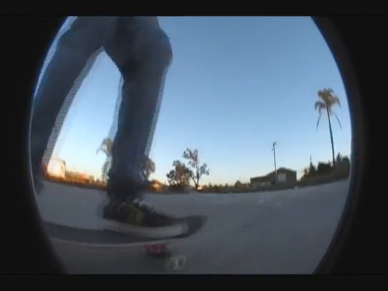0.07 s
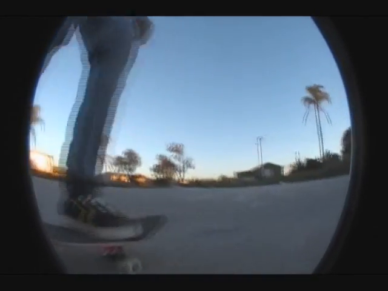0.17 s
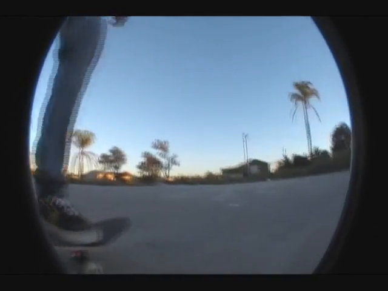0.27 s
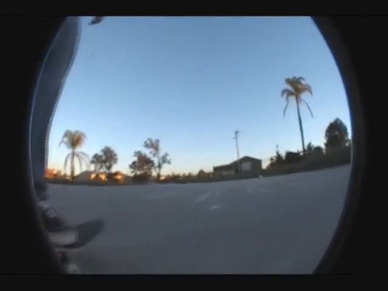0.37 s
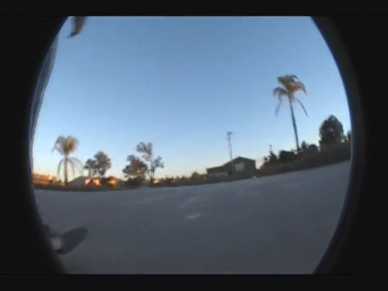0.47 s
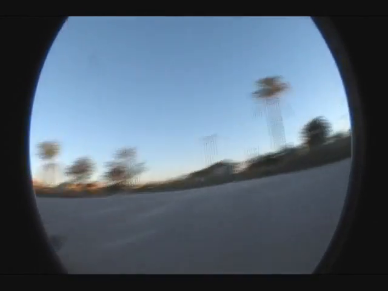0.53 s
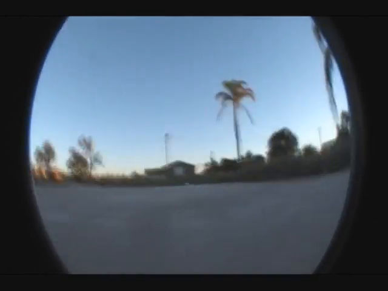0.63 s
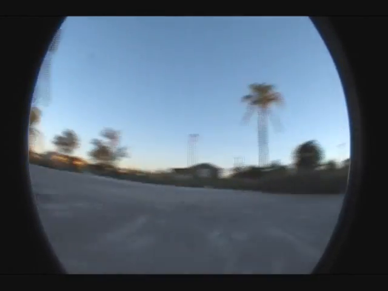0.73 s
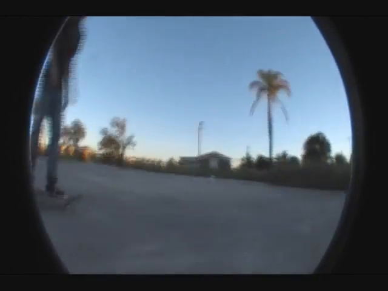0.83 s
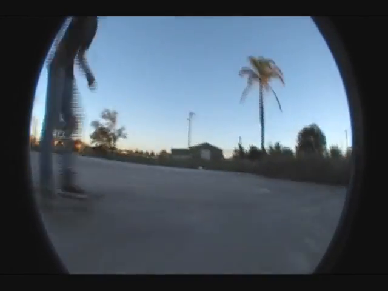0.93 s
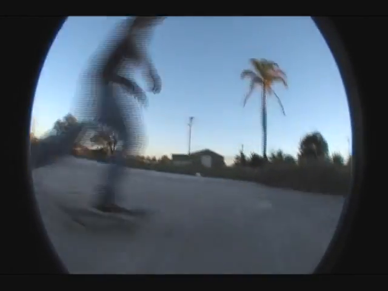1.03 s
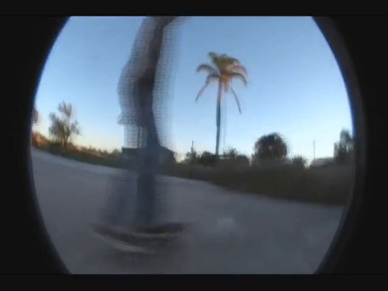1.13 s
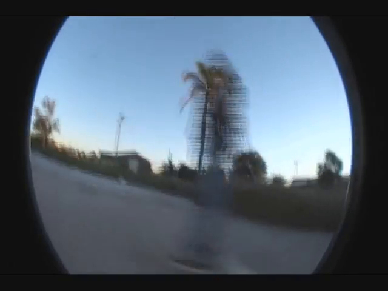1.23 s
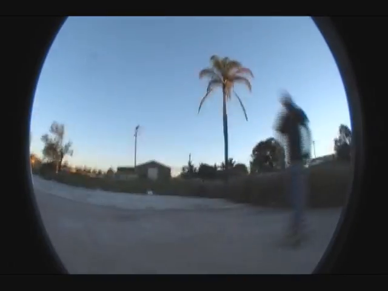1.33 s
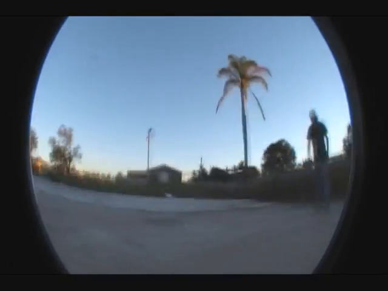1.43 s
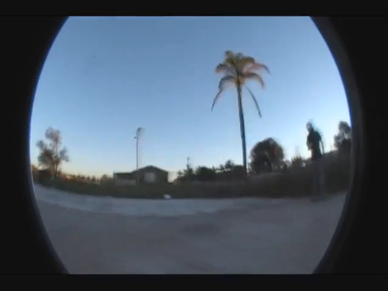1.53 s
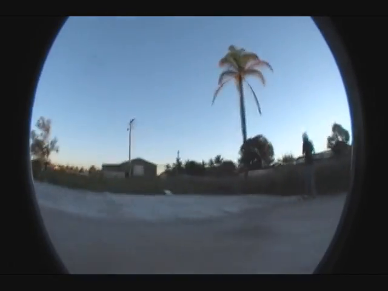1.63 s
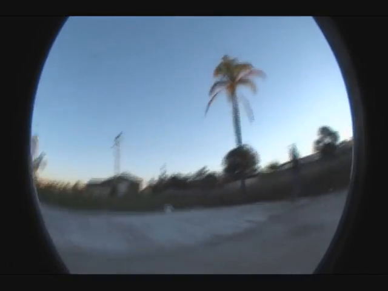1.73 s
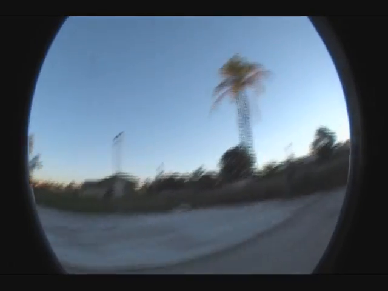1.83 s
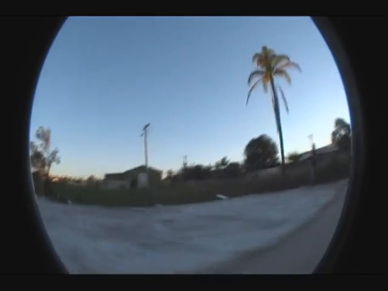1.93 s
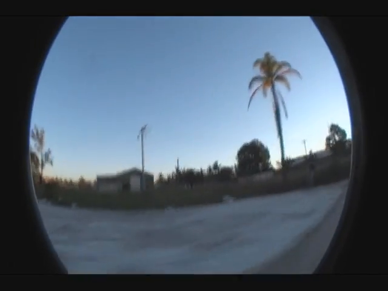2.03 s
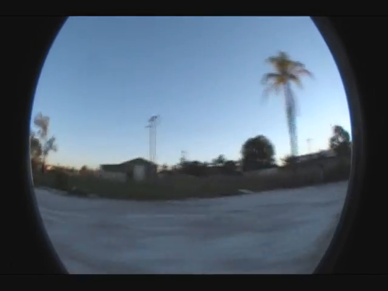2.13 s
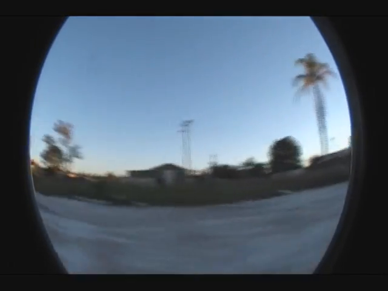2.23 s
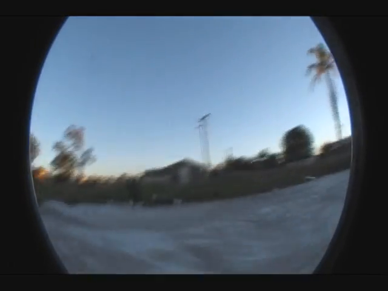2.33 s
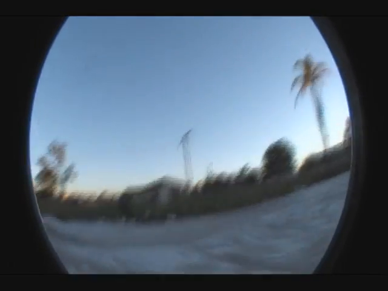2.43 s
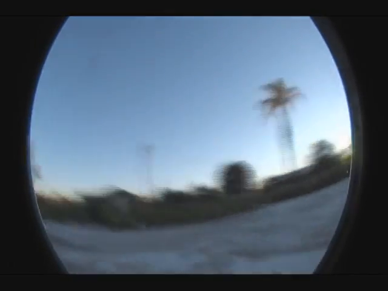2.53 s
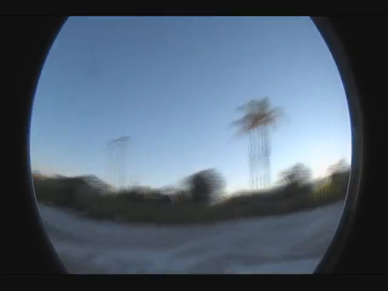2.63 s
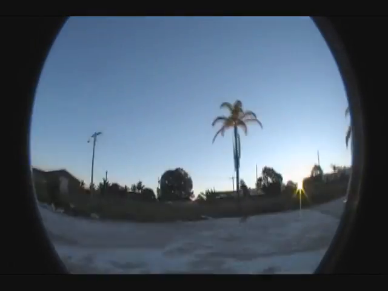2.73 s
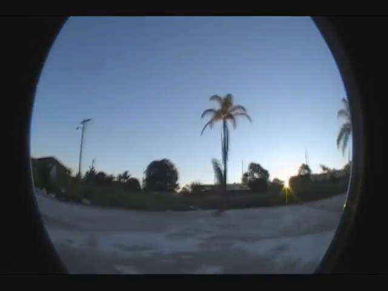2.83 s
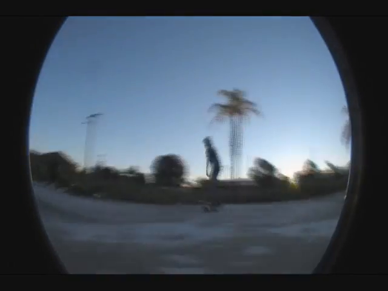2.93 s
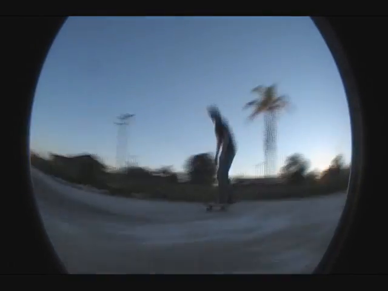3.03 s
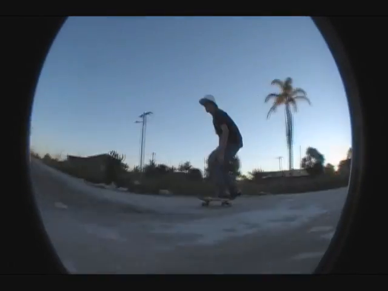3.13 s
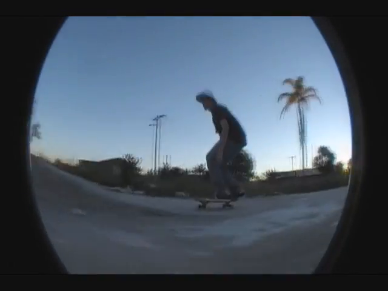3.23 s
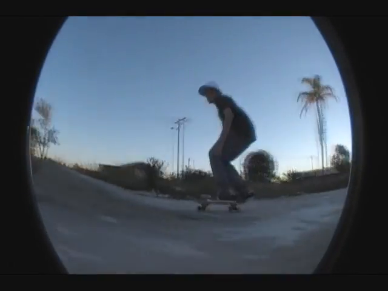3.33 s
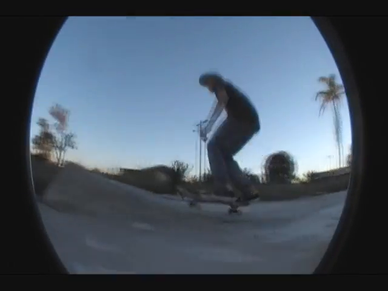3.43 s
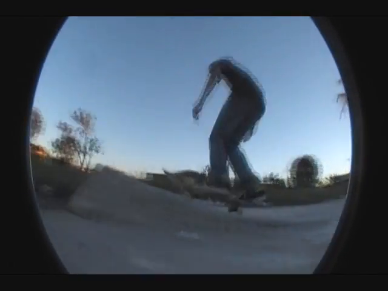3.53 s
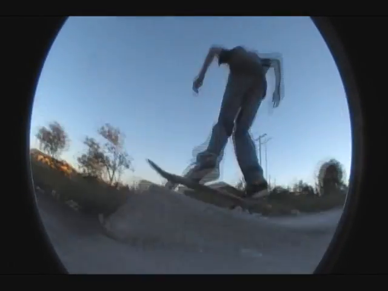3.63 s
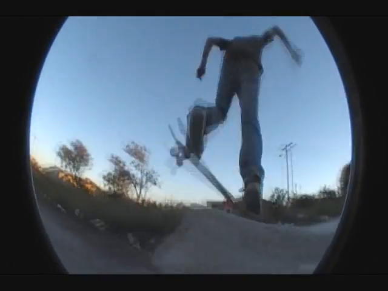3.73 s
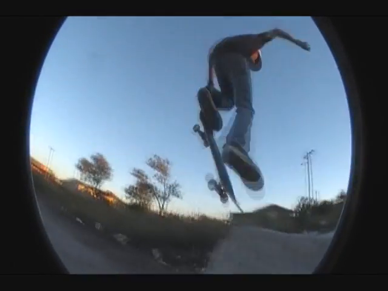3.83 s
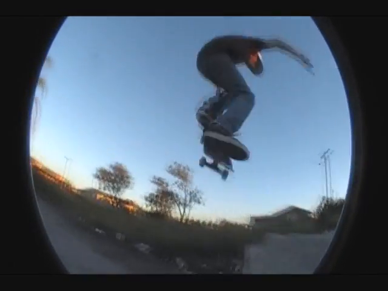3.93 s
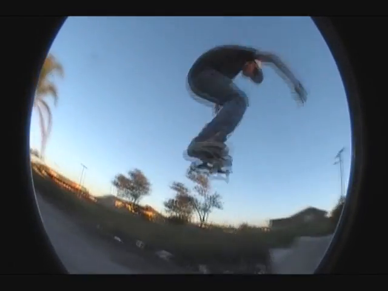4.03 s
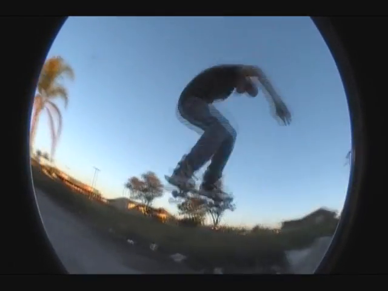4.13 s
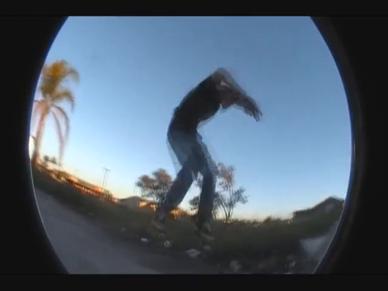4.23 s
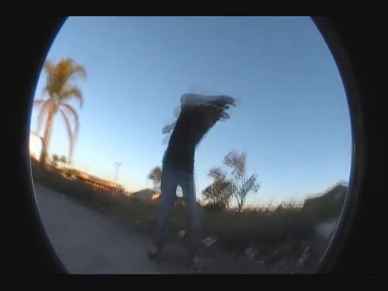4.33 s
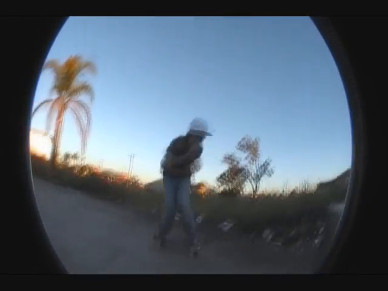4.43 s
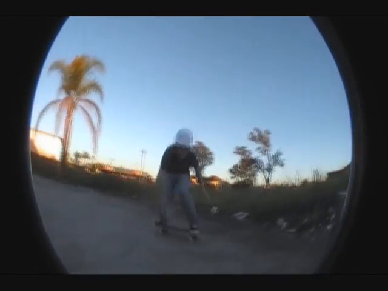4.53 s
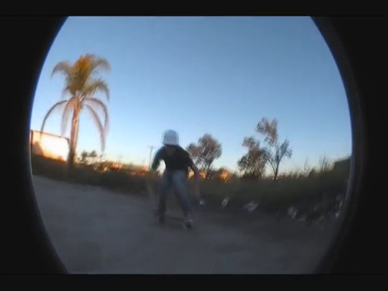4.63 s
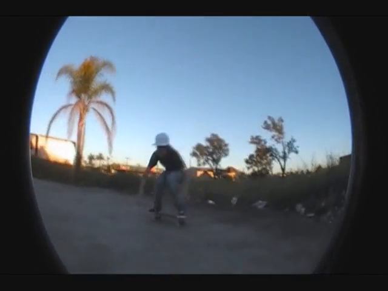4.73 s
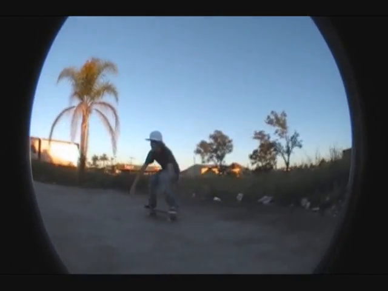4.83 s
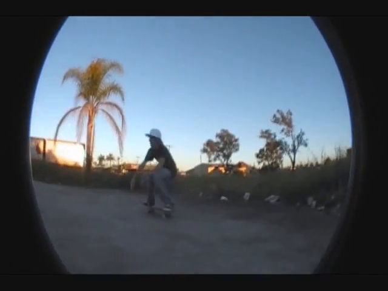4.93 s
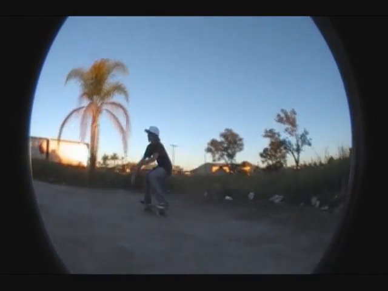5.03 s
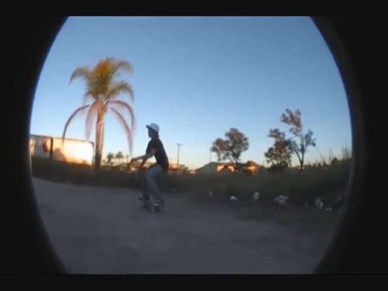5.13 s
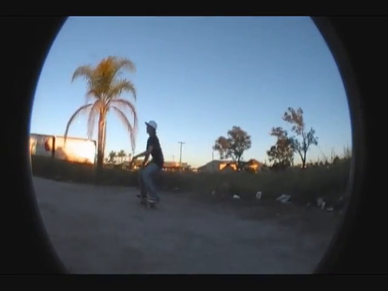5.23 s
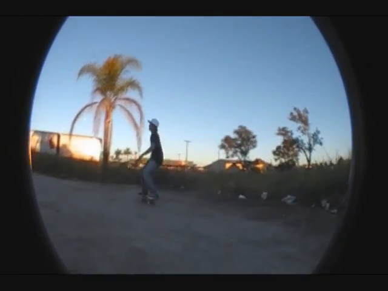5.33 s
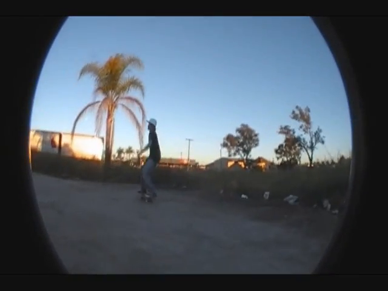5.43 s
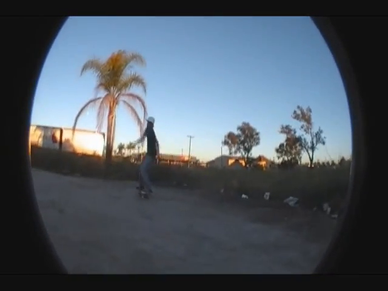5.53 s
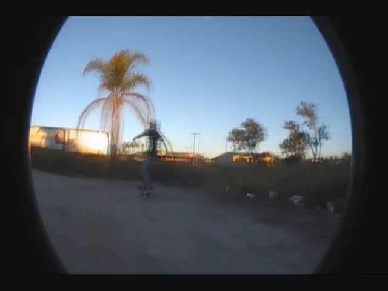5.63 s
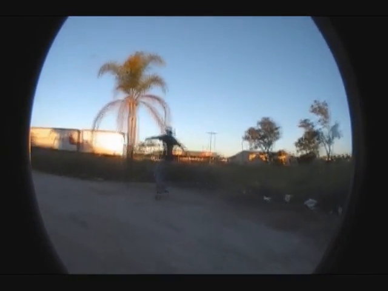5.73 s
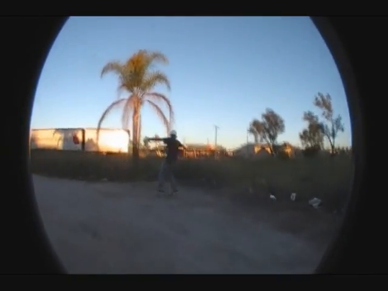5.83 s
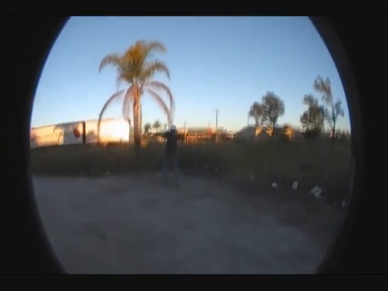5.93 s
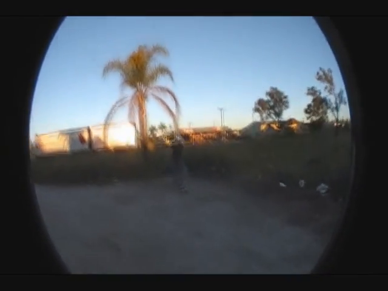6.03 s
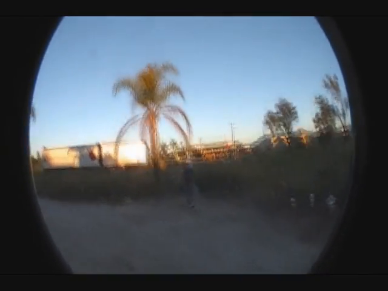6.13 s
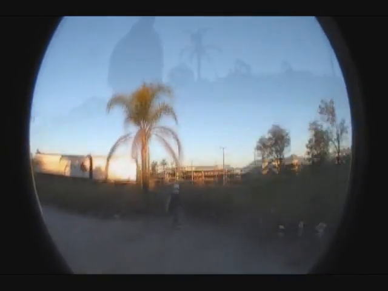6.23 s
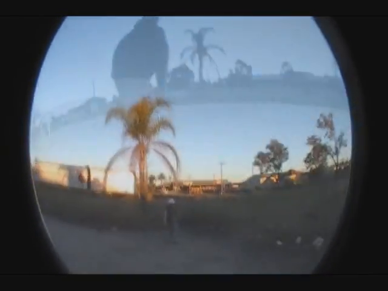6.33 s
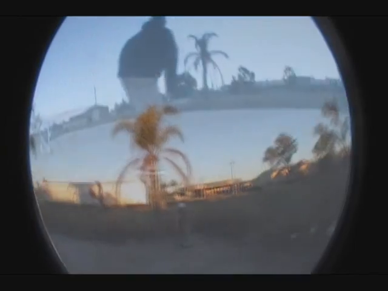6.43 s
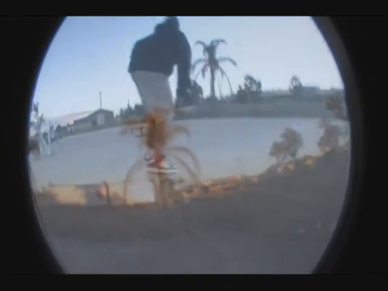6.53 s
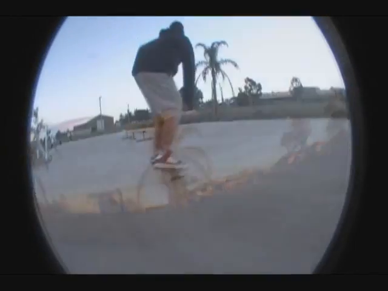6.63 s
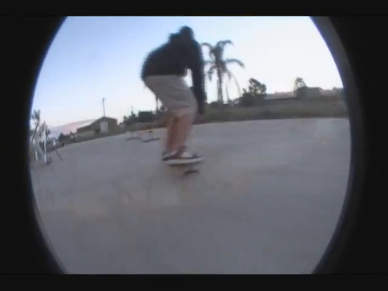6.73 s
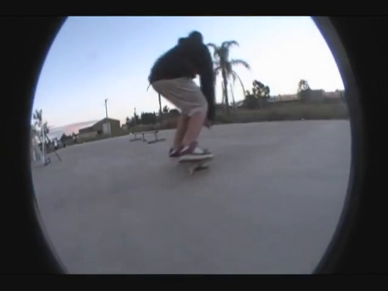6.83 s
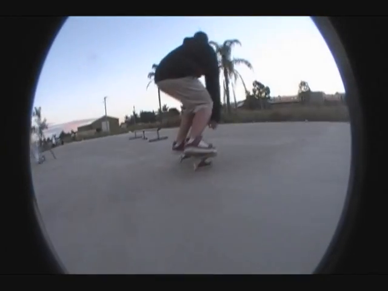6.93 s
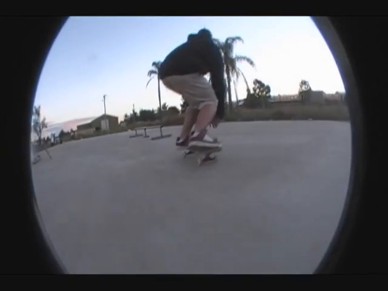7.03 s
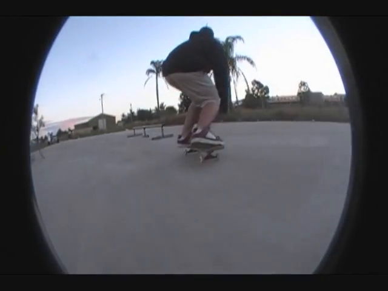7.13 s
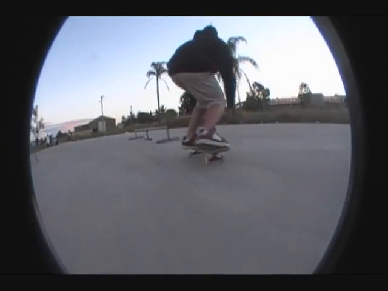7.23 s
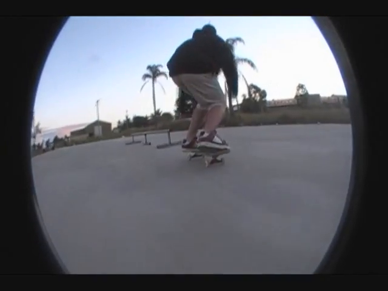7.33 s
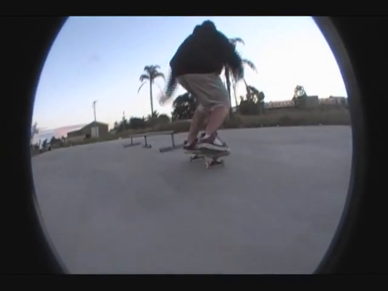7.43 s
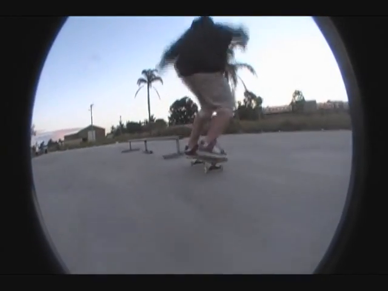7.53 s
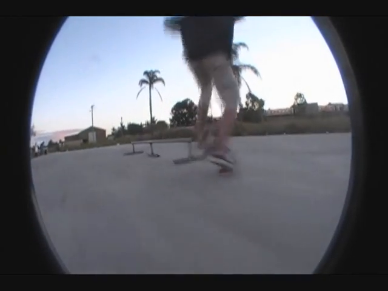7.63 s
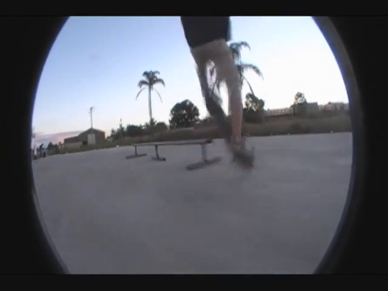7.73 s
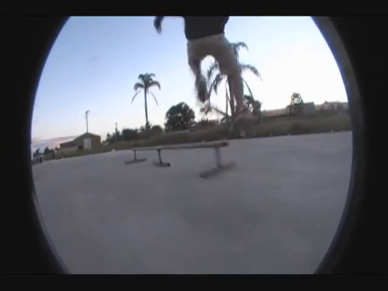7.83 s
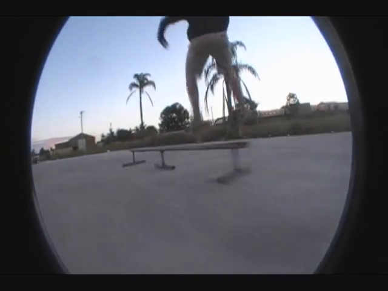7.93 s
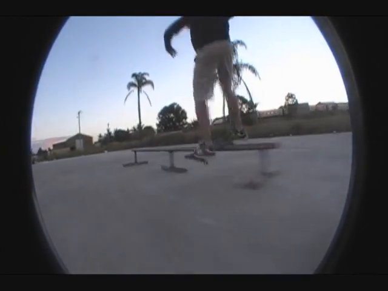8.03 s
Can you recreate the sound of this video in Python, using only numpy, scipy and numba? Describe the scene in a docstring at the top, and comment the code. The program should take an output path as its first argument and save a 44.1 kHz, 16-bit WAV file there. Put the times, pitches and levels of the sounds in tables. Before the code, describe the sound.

Skateboard wheels rumble and grind loudly over rough concrete outdoors, a pop, a quiet airborne gap, a hard landing clack, then another board rolls and pops.

```python
"""Skateboards rumble, rattle and hiss on rough concrete outdoors, heard from a camera that rolls along.
Random grit impacts drive filters for deck, trucks and wheels; a bright grinding replaces them for a while.
Decaying noise makes slams and stone ticks, damped sines make knocks, and gliding sines bearing squeaks.
Moving resonances ring, harmonics of a slowing wheel hum and low noise makes wind; loud peaks duck the gain."""
import sys
import numpy as np
from scipy import signal
from scipy.fft import rfft, irfft, next_fast_len
from scipy.io import wavfile
from scipy.ndimage import uniform_filter1d
from numba import njit

SR = 44100
rng = np.random.default_rng(int(sys.argv[2]) if len(sys.argv) > 2 else 0)


def log_audio(samples):
    """Write samples as a 16-bit WAV file to the path given in sys.argv[1]."""
    # one column per channel
    frames = np.atleast_2d(samples).T
    # limit to full scale, then quantise
    limited = np.clip(frames, -1, 1)
    pcm = np.round(limited * 32767).astype(np.int16)
    wavfile.write(sys.argv[1], SR, pcm)


N = 356769


def from_db(db):
    """Decibels to amplitude ratio: 20 dB per factor of ten."""
    return 10 ** (np.asarray(db) / 20)


def rms_one(x):
    """Scale to unit effective (root-mean-square) value."""
    return x / np.sqrt(np.mean(x ** 2) + 1e-20)


def colour(x, spectrum):
    """Minimum-phase filtering: folding the cepstrum makes the given magnitude response causal."""
    size = next_fast_len(N + 8192)
    hz = np.maximum(np.fft.rfftfreq(size, 1 / SR), 1)
    point_hz, point_db = np.transpose(spectrum)
    gain_db = np.interp(np.log(hz), np.log(point_hz), point_db)
    cepstrum = irfft(np.log(from_db(gain_db)), size)
    cepstrum[1:size // 2] *= 2
    cepstrum[size // 2 + 1:] = 0
    response = np.exp(rfft(cepstrum))
    return irfft(rfft(x, size) * response, size)[..., :N]


def drift(rate_hz):
    """Random modulation of spread 1: white noise through two equal low-pass poles."""
    r = np.exp(-2 * np.pi * rate_hz / SR)
    noise = rng.standard_normal(N + SR)
    settled = signal.lfilter([1], [1, -2 * r, r * r], noise)[SR:]
    return rms_one(settled)


def in_time(rows):
    """A level or rate against time: (s, value) points joined by straight lines."""
    s, value = np.transpose(rows)
    return np.interp(np.arange(N) / SR, s, value)


def spells(rows):
    """Envelopes of incoherent events, whose powers add: each row rises, holds and falls."""
    edge_db = -8.5      # level at the start and after the fall, relative to the hold
    gap_db_s = 398      # decay rate after the fall; ten times as steep before the start
    t, power = np.arange(N) / SR, 1e-12
    for start, stop, rise, fall, *levels_db in rows:
        rising = np.clip(1 - (t - start) / max(rise, 1e-3), 0, 1)
        falling = np.clip((t - stop) / max(fall, 1e-3), 0, 1)
        outside = 10 * np.maximum(start - t, 0) + np.maximum(t - stop - fall, 0)
        shape = from_db(edge_db * (rising + falling) - gap_db_s * outside)
        power = power + np.outer(from_db(levels_db), shape) ** 2
    return np.sqrt(power)


def thin():
    """A crossfade gate: 1 in the thin stretch, else 0, with 2 ms edges."""
    # stretch where thin grinding replaces the rolling: start_s, stop_s
    stretch = (.62, 3.155)
    t = np.arange(N) / SR
    inside = (t > stretch[0]) & (t < stretch[1])
    return uniform_filter1d(1. * inside, size=90)


def add_at(out, start_s, sound):
    """Superposition: sounds that overlap in time simply add."""
    out[round(start_s * SR):][:len(sound)] += sound


def grit(per_s, uneven_db, smooth, lumpy_db):
    """Contact forcing: uneven grains struck at random over a smooth rub, in rougher and smoother patches."""
    sizes = from_db(uneven_db * np.minimum(rng.exponential(1, N), 4.2))
    signs = rng.choice([-1, 1], N)
    struck = rng.random(N) < per_s / SR
    grains = rms_one(sizes * signs * struck)
    share = np.clip(smooth, 0, 1)     # share of the power that is smooth rub
    rub = np.sqrt(1 - share) * grains + np.sqrt(share) * rng.standard_normal(N)
    return rub * from_db(lumpy_db * drift(22.0))


def rattle():
    """Loose bearings chatter: random impulses with exponential decay flare up a gain of unit RMS."""
    per_s, decay_s, lift_db = 45.0, 0.0022, 2.5
    impulses = (rng.random(N) < per_s / SR) * rng.exponential(1, N)
    r = np.exp(-1 / (decay_s * SR))
    flares = signal.lfilter([1], [1, -r], impulses + 1e-18)
    return rms_one(1 + from_db(lift_db) * flares)


def rolling():
    """Source and filter: one stream of grit drives deck, trucks and wheels; roughness returns every turn."""
    # deck rumble as boards come near, leave the ground and roll off, then swelling back from 6.2 s: time_s,
    # level_db
    deck_levels = [(0, -15.5), (.61, -18), (3.165, -35), (3.4, -32), (3.42, -23), (3.54, -23),
                   (3.57, -21.5), (3.84, -20.5), (3.88, -44), (4.58, -41), (4.8, -38), (6.19, -45),
                   (6.25, -37.5), (6.45, -17.5), (7.66, -13.5), (7.76, -21), (8.09, -18.5)]
    # scuffs of shoes, tail and skidding wheels: start_s, stop_s, rise_s, fall_s, rattle_db, hiss_db
    scuffs = [(3.41, 3.45, .008, 0.0091, -25.5, -35), (3.78, 3.845, 0.013, 0.0035, -23, -26.5),
              (4.035, 4.085, 0.019, 0.086, -26.5, -64), (5.848, 5.915, 0.0023, 0.01, -19, -22),
              (5.96, 6.06, 0.012, 0.022, -62, -37.5), (7.78, 7.93, 0.055, 0.041, -23, -31)]
    # wheel hiss above or below the level that follows the deck: time_s, offset_db
    brightness = [(0, 3), (.25, -3), (.61, -3.5), (3.165, 1.5), (4.6, 0.5), (5.8, -3.5), (6.3, -7),
                  (6.9, 3.5), (7.7, 1), (8.09, -0.5)]
    # relative spectrum of the deck: frequency_hz, density_db (per Hz)
    deck_spectrum = [(70, -38.5), (130, -17), (301, -2.5), (420, 1), (519, 2.5), (700, -8.5), (1100, -22),
                     (2200, -120)]
    # relative spectrum of the trucks: frequency_hz, density_db (per Hz)
    truck_spectrum = [(470, -17), (800, 3), (966, 0), (1310, 6), (1610, 1.5), (2200, -5), (3400, -13.5),
                      (5200, -53)]
    # relative spectrum of the wheel hiss: frequency_hz, density_db (per Hz)
    hiss_spectrum = [(1880, -29), (3500, -6), (5600, -6.5), (8970, -2), (15500, -25.5)]
    near_db = -15                                    # deck level of a board close by
    trucks_near_db, trucks_follow = -21, 0.59        # level then, share of the deck's dB swing followed
    hiss_near_db, hiss_follow = -33, 0.34
    turn_s, turn_repeat = .040, .3                   # one wheel turn, share fed back from turn to turn

    deck_db = in_time(deck_levels)
    swing_db = deck_db - near_db
    scuff_rattle, scuff_hiss = spells(scuffs)
    truck_level = np.hypot(from_db(trucks_near_db + trucks_follow * swing_db), scuff_rattle)
    hiss_db = hiss_near_db + in_time(brightness) + hiss_follow * swing_db
    hiss_level = np.hypot(from_db(hiss_db), scuff_hiss)

    bumps = grit(per_s=350.0, uneven_db=3.0, smooth=0.37, lumpy_db=2.5)     # coarse stones
    force = 0.35 * bumps + grit(per_s=1200.0, uneven_db=2.0, smooth=0.58, lumpy_db=2.0)
    turn = round(turn_s * SR)
    turns = np.resize(force + 1.84 * bumps, (N // turn + 1, turn))     # one row for each turn
    returning = signal.lfilter([1], [1, -turn_repeat], turns, axis=0).ravel()[:N]
    rub = (force + 1.1 * rng.standard_normal(N)) * rattle()     # the wheel surface rubs more evenly

    deck = from_db(deck_db) * rms_one(colour(returning, deck_spectrum))
    trucks = truck_level * rms_one(colour(force, truck_spectrum))
    hiss = hiss_level * rms_one(colour(rub, hiss_spectrum))
    return (deck + trucks + hiss) * (1 - thin())


@njit
def resonate(x, hz, width_hz, sr):
    """A two-pole resonance: pole angle sets the moving centre, pole radius the bandwidth."""
    y, r = np.zeros(len(x)), np.exp(-np.pi * width_hz / sr)
    for i in range(2, len(x)):
        drive = (1 - r * r) / 2 * (x[i] - x[i - 2])
        y[i] = drive + 2 * r * np.cos(2 * np.pi * hz[i] / sr) * y[i - 1] - r * r * y[i - 2]
    return y


def rings():
    """Resonance excited by rub: uneven noise through a gliding double resonance, swelling and fading."""
    # rings and squeals that come and go with load and angle, level ahead of the fades:
    # start_s, stop_s, from_hz, to_hz, width_hz, level_db
    ring_rows = [(0, .62, 523, 520, 110, -22.5), (.62, .76, 2030, 2000, 250, -19.5),
                 (1.0, 1.21, 1830, 1760, 400, -19), (1.0, 1.21, 3350, 3260, 404, -19),
                 (1.21, 1.285, 1500, 2050, 60, -17), (1.245, 1.285, 2350, 2550, 80, -19),
                 (1.47, 1.61, 9500, 10000, 1800, -27), (1.66, 2.5, 2850, 2960, 260, -21),
                 (2.87, 3.12, 4680, 4460, 200, -39.5), (3.16, 3.5, 144, 145, 83, -39),
                 (3.54, 3.8, 680, 740, 340, -18.5), (3.55, 3.86, 268, 252, 118, -20.5),
                 (4.735, 4.8, 2300, 2200, 198, -39.5), (5.888, 5.918, 1030, 1040, 200, -20)]
    out, force = np.zeros(N), grit(per_s=2000.0, uneven_db=2.5, smooth=1.0, lumpy_db=3.5)
    for k, (start, stop, from_hz, to_hz, width_hz, db) in enumerate(ring_rows):
        a, b = round(start * SR), round(stop * SR)
        hz = np.linspace(from_hz, to_hz, b - a)
        part = np.roll(force, k * SR // 2)[a:b]
        # two passes narrow the band, so each one is wider
        once = resonate(part, hz, 1.5 * width_hz, SR)
        ring = resonate(once, hz, 1.5 * width_hz, SR)
        out[a:b] += from_db(db) * rms_one(ring) * signal.windows.tukey(b - a, .35)
    return out


def wind():
    """Turbulent pressure: lumpy low noise, partly coherent between two ports, weaker in the thin stretch."""
    # relative spectrum of the wind: frequency_hz, density_db (per Hz)
    wind_spectrum = [(40, -4), (90, 17.5), (200, 20.5), (400, 2)]
    level_db, thin_drop_db = -51.5, 11.0
    shared, left, right = rng.standard_normal((3, N))
    ports = 1.2 * shared + np.array([left, right])
    puffs = colour(ports, wind_spectrum) * from_db(6.0 * drift(8.0))
    return from_db(level_db - thin_drop_db * thin()) * rms_one(puffs)


def ticks():
    """Impact noise: a short burst, swelling for a moment, passes a broad band around its centre."""
    # small stones and loose parts: start_s, peak_db, centre_hz
    tick_rows = [(0.0888, -4.5, 3000), (0.24, -7.5, 3700), (0.326, -6, 1520), (0.756, -2, 7800),
                 (0.971, 2.5, 6300), (0.9807, -6, 6000), (1.274, 4, 8400), (1.3027, 3.5, 6800),
                 (1.351, -2, 8000), (1.371, 2, 2540), (1.384, 5.5, 3400), (1.404, 6.5, 5860),
                 (2.298, -3.5, 9100), (2.646, -10.5, 7000), (2.676, -10, 9600), (2.691, -5.5, 9000),
                 (2.707, -7, 9050), (2.721, -6, 9500), (2.7696, -6, 3100), (2.7806, -10.5, 3500),
                 (2.895, -16, 5200), (3.109, -15, 4500), (3.142, -15, 5500), (3.411, -14, 2010),
                 (3.626, -11.5, 7450), (3.69, -14, 6950), (3.729, -12, 8000), (4.808, -15, 990),
                 (4.824, -22, 1300), (5.38, -22, 5500), (5.665, -13, 1000), (5.688, -17, 2170),
                 (5.717, -19, 1490), (5.878, -11, 1980), (6.03, -24, 1800), (6.326, -20, 7100)]
    out, t = np.zeros(N + SR), np.arange(SR // 10) / SR
    shape = (1 - np.exp(-t / 0.00034)) * from_db(-60 * t / 0.019)     # rise and 60 dB decay, in s
    draws = rng.standard_normal((len(tick_rows), len(t)))
    for (s, peak_db, hz), draw in zip(tick_rows, draws):
        band = signal.butter(2, [hz / 2.1, min(hz * 1.54, .45 * SR)], "band", fs=SR)
        burst = signal.lfilter(*band, draw * shape)
        add_at(out, s, from_db(peak_db) * burst / np.abs(burst).max())
    return out[:N]


def slams():
    """Impact excitation: a decaying burst shakes the board's wood and cracks drily, the crack dying sooner."""
    # tail pops, landings and joints in the concrete, levels ahead of the colouring and body lift:
    # start_s, body_db, crack_db, t60_s (of the body)
    slam_rows = [(0.1168, -4, -2.5, 0.017), (0.1673, -9, -7, 0.039), (3.8651, -5, -1, 0.05),
                 (4.4286, -1.5, -6, 0.066), (4.4476, 6, 2, 0.09), (6.7268, 1.5, -10.5, 0.041),
                 (6.8992, 2.5, -12, 0.043), (7.8451, 4, 0.5, 0.038)]
    # response of the woody body: frequency_hz, gain_db
    body_spectrum = [(60, -17.5), (300, -7.5), (650, 2.5), (1400, 2), (4000, -11), (7000, -43.5)]
    # response of the dry crack: frequency_hz, gain_db
    crack_spectrum = [(500, -62), (1500, 1), (2500, 12.5), (12000, -13), (16000, -25)]
    body_lift_db = 5.5
    body, crack, t = np.zeros(N + SR), np.zeros(N + SR), np.arange(SR // 5) / SR
    draws = rng.standard_normal((len(slam_rows), len(t)))
    for (s, body_db, crack_db, t60), draw in zip(slam_rows, draws):
        add_at(body, s, from_db(body_db - 60 * t / t60) * draw)
        add_at(crack, s, from_db(crack_db - 60 * t / (0.89 * t60)) * draw)
    return from_db(body_lift_db) * colour(body[:N], body_spectrum) + colour(crack[:N], crack_spectrum)


def knocks():
    """Damped free vibration: a hard lump sets off a short hollow ring, softly started, roughened by noise."""
    # hard lumps that knock the deck: start_s, peak_db, pitch_hz
    knock_rows = [(0.298, -5, 500), (0.498, 0.5, 465), (3.557, -10, 675), (3.627, -5, 674), (3.72, -2, 667),
                  (3.730, -4, 600), (3.791, -5.5, 1030), (4.427, -7, 417), (4.453, 6, 683),
                  (5.853, -16, 1640), (6.217, -18, 1280), (6.397, -14, 1110), (7.642, -4, 446),
                  (7.676, -8.5, 507)]
    decay_cycles = 24.4     # cycles until 60 dB down
    out, t = np.zeros(N + SR), np.arange(SR // 10) / SR
    draws = rng.standard_normal((len(knock_rows), len(t)))
    for (s, peak_db, hz), draw in zip(knock_rows, draws):
        roughness = 0.11 * signal.lfilter([.3], [1, -.7], draw)
        onset = 1 - np.exp(-2 * hz * t)
        decay = from_db(-60 * hz * t / decay_cycles)
        ring = (np.sin(2 * np.pi * hz * t) + roughness) * onset * decay
        add_at(out, s, from_db(peak_db) * ring / np.abs(ring).max())
    return out[:N]


def patchy(x, edges_hz, patchy_db, rate_hz):
    """Band-wise amplitude modulation: each band swells and sinks on its own."""
    waver_db = patchy_db * drift(rate_hz)
    total = 0
    for k, edge in enumerate(zip(edges_hz, edges_hz[1:])):
        band = signal.sosfilt(signal.butter(2, edge, "band", fs=SR, output="sos"), x)
        # alternate signs where neighbouring bands overlap
        total = total + (-1) ** k * band * from_db(np.roll(waver_db, k * SR))
    return rms_one(total)


def grinding():
    """Dense impact noise: frequent, uneven grains without deck boom, their colour shifting in patches."""
    # separate spells, most swelling to a sudden end:
    # start_s, stop_s, rise_s, fall_s, grind_db, sizzle_db
    grind_rows = [(.62, .755, 0.0036, 0.021, -16, -19.5), (.765, .89, 0.068, 0.046, -20, -24.5),
                  (.9, .92, 0.028, 0.008, -14, -15.5), (.925, .968, 0.011, 0.0052, -21, -20.5),
                  (.985, 1.21, 0.021, 0.024, -14.5, -17), (1.22, 1.277, 0.049, 0.0084, -10.5, -11),
                  (1.29, 1.352, 0.061, 0.0051, -8, -11), (1.36, 1.395, 0.02, 0.01, -9, -17),
                  (1.41, 1.6, 0.12, 0.0092, -13, -16.5), (1.615, 2.298, 0.091, 0.0026, -9.5, -17),
                  (2.303, 2.43, 0.011, 0.066, -15, -21), (2.49, 2.615, 0.024, 0.042, -20, -23.5),
                  (2.68, 2.9, 0.34, 0.09, -29.5, -30.5), (2.92, 3.16, 0.11, 0.013, -33, -34)]
    # relative spectrum of the grind: frequency_hz, density_db (per Hz)
    grind_spectrum = [(150, -51.5), (500, -31.5), (760, -19.5), (1200, -13.5), (2200, -8.5), (3050, -9.5),
                      (3300, -17), (5400, -59.5)]
    # relative spectrum of the brighter sizzle: frequency_hz, density_db (per Hz)
    sizzle_spectrum = [(2060, -26), (4100, 1.5), (5300, 3.5), (6800, -3), (10500, -9.5), (16000, -14.5)]
    grind_level, sizzle_level = spells(grind_rows)
    force = grit(per_s=2500.0, uneven_db=5.2, smooth=0.52, lumpy_db=1.2)
    force = patchy(force, np.geomspace(30, 18000, num=13), patchy_db=3.0, rate_hz=6.1)
    grind = grind_level * rms_one(colour(force, grind_spectrum))
    sizzle = sizzle_level * rms_one(colour(force, sizzle_spectrum))
    return (grind + sizzle) * thin()


def hum():
    """Periodic excitation: multiples 8 to 22 of a wheel's slowing turn rate, each wavering on its own."""
    # turn rate of the wheel: time_s, turns_per_s
    turn_rates = [(1.75, 78), (2.05, 69.5), (2.31, 64)]
    # level of a harmonic by its frequency, ahead of waver and fades: frequency_hz, level_db
    harmonic_levels = [(550, -47), (1200, -23), (1500, -49)]
    a, b = round(turn_rates[0][0] * SR), round(turn_rates[-1][0] * SR)
    per_s = in_time(turn_rates)[a:b]
    turns, out = np.cumsum(per_s) / SR, np.zeros(N)
    waver_db = 4.0 * drift(4.6)
    for k in range(8, 23):
        level_db = np.interp(k * per_s, *np.transpose(harmonic_levels))
        level_db = level_db + np.roll(waver_db, k * SR // 3)[a:b]
        out[a:b] += from_db(level_db) * np.sin(2 * np.pi * (k * turns + rng.random()))
    out[a:b] *= signal.windows.tukey(b - a, .2)
    return out


def squeaks(length_s=0.016, fall=0.11):
    """Frequency glide: brief bearing whistles sag by the share `fall` around their middle pitch."""
    # bearing squeaks: start_s, peak_db, pitch_hz (middle)
    squeak_rows = [(6.95, -22, 9080), (7.271, -21, 8450), (7.4, -22.5, 9400), (7.585, -16, 8800),
                   (7.74, -28, 5700), (7.95, -23, 5270)]
    out, t = np.zeros(N + SR), np.arange(round(length_s * SR)) / SR
    for s, peak_db, hz in squeak_rows:
        cycles = hz * t * (1 + fall * (.5 - t / length_s / 2))
        add_at(out, s, from_db(peak_db) * np.hanning(len(t)) * np.sin(2 * np.pi * cycles))
    return out[:N]


def scene():
    """Mid-side stereo: left and right are the sum and difference of a common and a fluttering signal."""
    # fluttering side signal against the mid: frequency_hz, side_minus_mid_db
    side_spectrum = [(60, -21), (5000, -16), (15000, -9.5)]
    # balance of the ports: time_s, left_minus_right_db
    balance = [(0, 0.5), (2.7, -0.5), (5.5, 2), (8.09, 0.2)]
    mid = rolling() + grinding() + rings() + hum() + slams() + knocks() + ticks() + squeaks()
    # four wheels sound from four spots: the difference between the ports flutters
    side = colour(mid * drift(300.0), side_spectrum)
    ports = (mid + side * [[1], [-1]]) * from_db(in_time(balance) * [[.5], [-.5]])
    low_cut = signal.butter(1, 50, "high", fs=SR, output="sos")
    return signal.sosfilt(low_cut, ports) + wind()


def record(dry):
    """Dynamic compression: peaks pull the gain down fast, it climbs back steadily; the excess clips."""
    duck_above_db, recover_db_s, attack_s = -2, 51.5, 0.00069
    cutoff_hz = 16300     # from here up the treble is 75 dB down
    peak_db = 20 * np.log10(np.abs(dry).max(0) + 1e-9)     # the louder channel rules both
    over_db = np.maximum(peak_db - duck_above_db, 0)
    climb_db = recover_db_s * np.arange(N) / SR
    held_db = np.maximum.accumulate(over_db + climb_db) - climb_db
    r = np.exp(-1 / (attack_s * SR))
    ducked = dry * from_db(-signal.lfilter([1 - r], [1, -r], held_db))
    treble_cut = signal.cheby2(16, 75, cutoff_hz, fs=SR, output="sos")
    return signal.sosfilt(treble_cut, np.clip(ducked, -1, 1))


dry = scene()
out = record(dry)
log_audio(out)
```